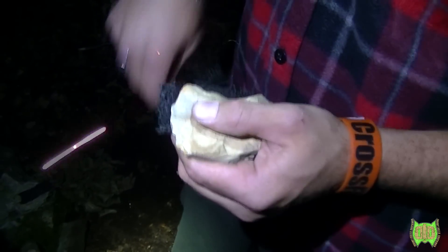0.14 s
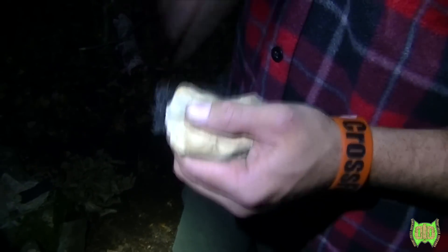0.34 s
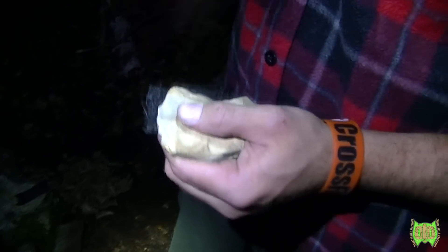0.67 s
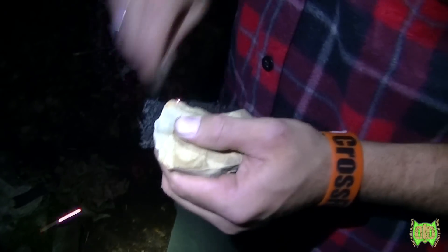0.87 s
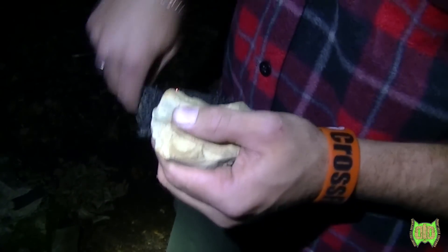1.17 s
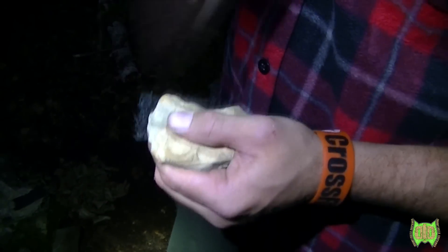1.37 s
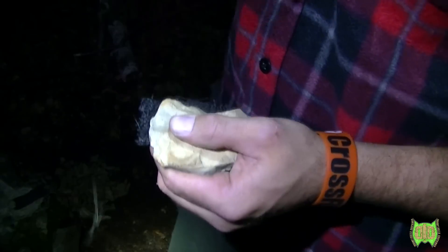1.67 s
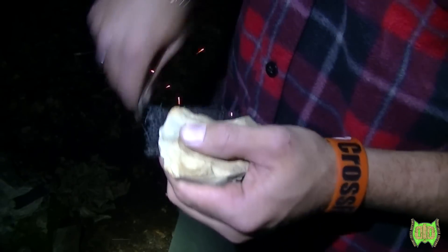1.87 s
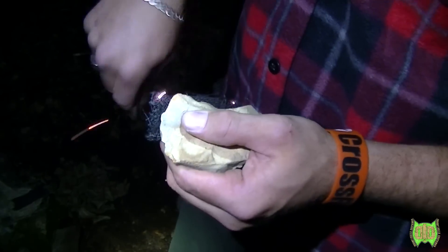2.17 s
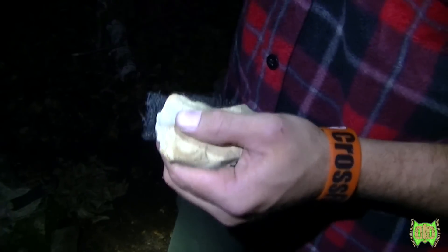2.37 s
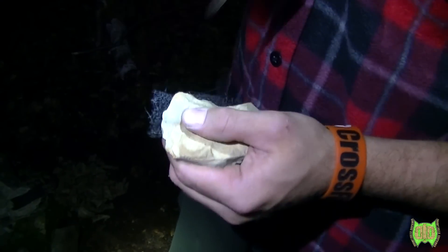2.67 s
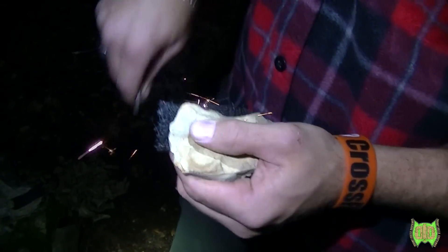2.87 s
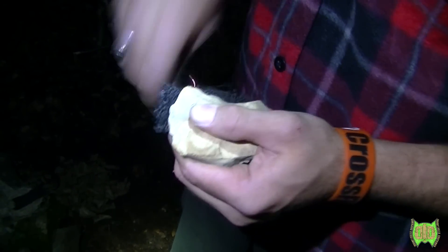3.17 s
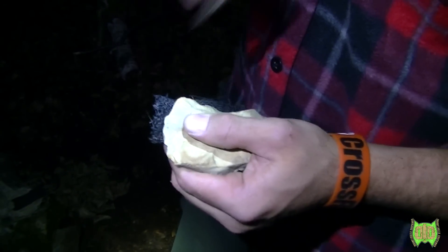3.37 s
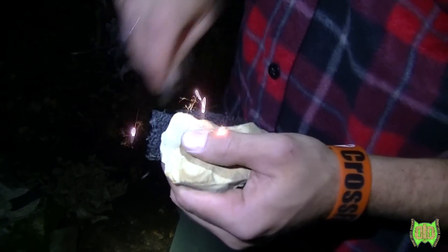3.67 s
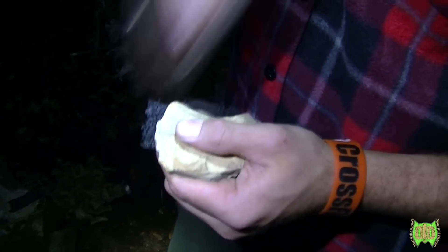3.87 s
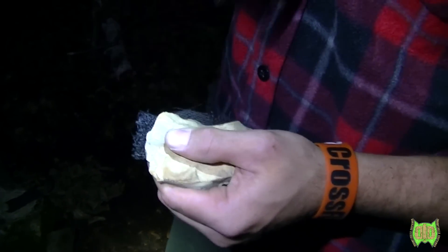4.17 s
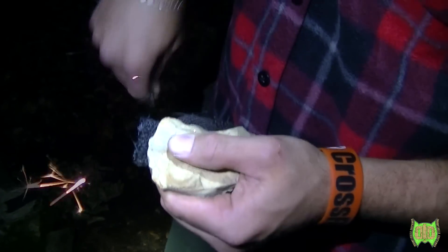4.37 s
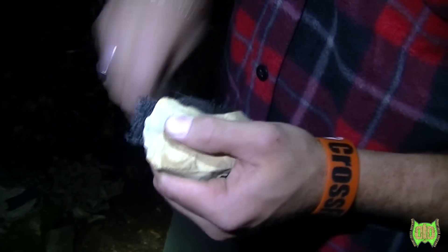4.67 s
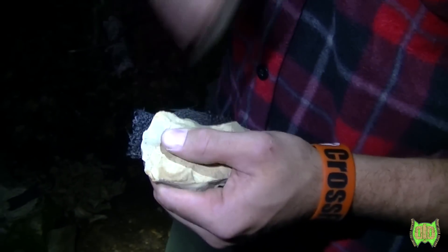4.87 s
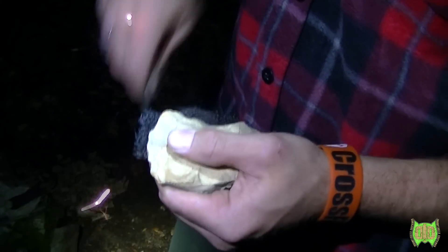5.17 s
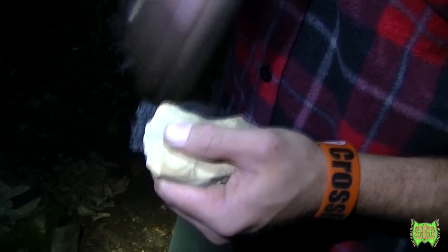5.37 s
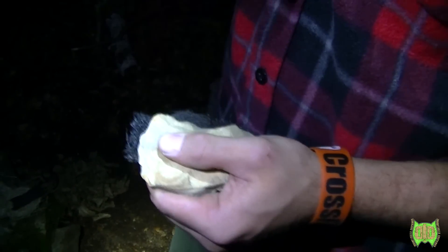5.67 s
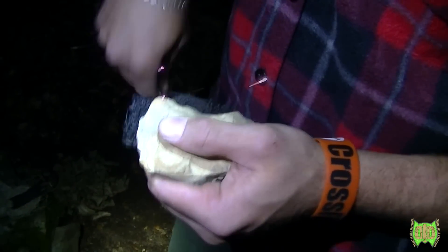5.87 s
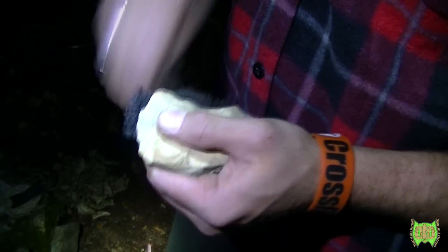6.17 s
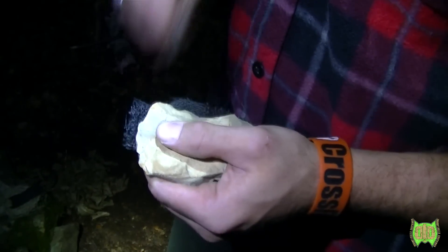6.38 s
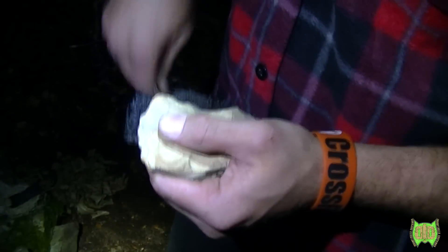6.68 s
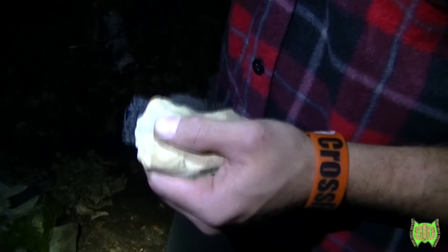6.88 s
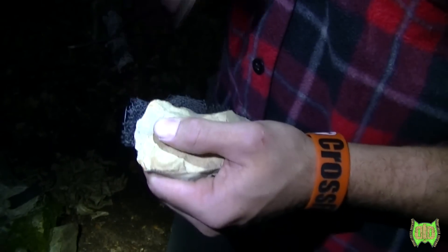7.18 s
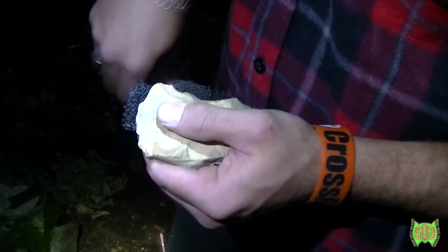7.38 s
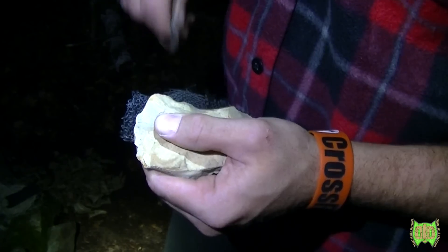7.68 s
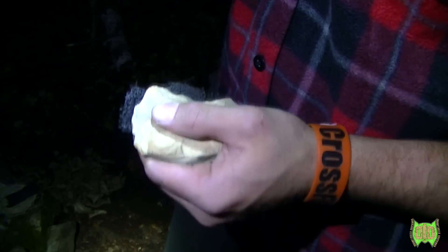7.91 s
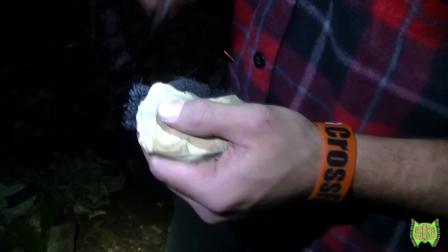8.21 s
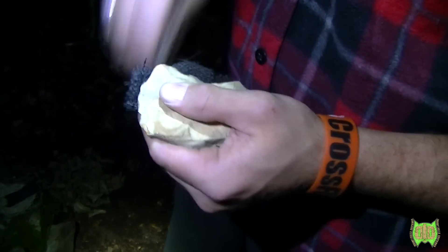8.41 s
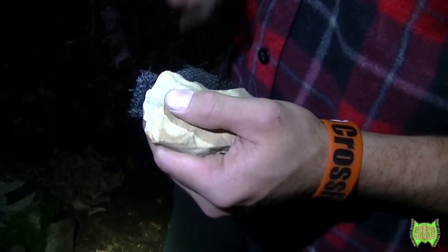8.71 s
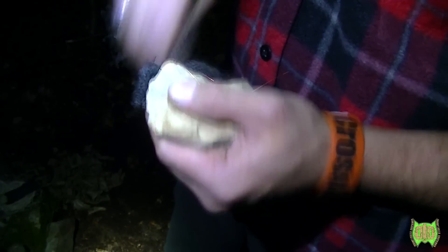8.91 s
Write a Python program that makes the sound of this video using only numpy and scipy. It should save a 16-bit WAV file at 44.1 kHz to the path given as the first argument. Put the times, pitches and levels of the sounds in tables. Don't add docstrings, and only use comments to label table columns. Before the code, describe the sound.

Hard, thin stone-and-metal clacks repeat at a steady but human pace, centred and close, slightly overloading the small microphone, which dips just afterwards. Some strokes are clean, others rasp or click twice. Around them, dry leaves start quietly, then swell in uneven shuffles with crisp crackles, growing busiest near the end. Open night air, with no noticeable echo.

```python
import sys
import numpy as np
from scipy import signal
from scipy.io import wavfile

SR = 44100
rng = np.random.default_rng(int(sys.argv[2]) if len(sys.argv) > 2 else 0)


def gain_from_db(level_db):
    decades = np.asarray(level_db, float) / 20
    return 10 ** decades


def to_wav(s):
    ch = np.atleast_2d(s).T
    pcm = np.round(np.clip(ch, -1, 1) * 32767)
    wavfile.write(sys.argv[1], SR, pcm.astype(np.int16))


N = 399105


def rms_one(x):
    return x / np.sqrt(np.mean(x ** 2) + 1e-20)


def at_hz(points, hz):
    point_hz, level = np.array(points)[:, :2].T
    return np.interp(np.log(hz), np.log(point_hz), level)


def butter(x, hz, kind, order=2):
    return signal.sosfilt(signal.butter(order, hz, kind, fs=SR, output="sos"), x)


def drift(rate_hz):
    r = np.exp(-20 * np.pi * rate_hz / SR)
    noise = rng.standard_normal(N // 10 + 4002)
    slow = signal.lfilter([1], [1, -2 * r, r * r], noise)[4000:]
    return np.interp(np.arange(N) / 10, np.arange(len(slow)), rms_one(slow))


def ring(clicks, hz, t60_s):
    r = gain_from_db(-60 / (t60_s * SR))
    w = 2 * np.pi * hz / SR
    return signal.lfilter([0, np.sin(w)], [1, -2 * r * np.cos(w), r * r], clicks + 1e-18)


def body(clicks, modes):
    return sum(gain_from_db(db) * ring(clicks, hz, t60_s) for hz, db, t60_s in modes)


def add(track, start_s, sound):
    i = round(start_s * SR)
    track[i:i + len(sound)] += sound[:N - i]


def shuffle_db():
    # loudest_s, rustle_db, swell_ms and sink_ms [ms per 10 dB]
    steps = [(0.093, -37, 181, 590), (0.55, -42.5, 150.0, 40.0), (0.784, -36.5, 75, 436),
             (1.434, -27.5, 75, 110), (1.605, -23.5, 224.0, 136), (1.845, -25, 67.0, 293.0),
             (2.066, -24, 94.0, 303), (2.384, -25.4, 8, 276.0), (2.822, -30, 361.0, 55),
             (3.337, -32.5, 1000.0, 258), (3.652, -38.0, 254.0, 93), (3.908, -32.5, 48.0, 988.0),
             (4.262, -20.0, 54, 457), (4.546, -21, 263.0, 117.0), (4.708, -24.5, 95, 61),
             (4.95, -32.2, 44, 479), (5.343, -29.5, 199, 467.0), (5.797, -34.5, 18, 107),
             (6.029, -30.5, 0, 137), (6.204, -32, 52.5, 164), (6.51, -24.5, 108, 166),
             (6.894, -38.5, 140.0, 67.0), (7.05, -35.1, 66, 69), (7.248, -32, 0, 440),
             (7.4, -30.6, 105, 353), (7.724, -28.5, 37, 424.0), (8.035, -22, 171, 59.0),
             (8.269, -24, 32, 924), (8.713, -24, 103, 30), (9.049, -20.5, 439, 98)]
    still_db = -47.5
    t = np.arange(0, N + 64, 64) / SR
    loudest_s, db, swell_ms, sink_ms = np.transpose(steps)[:, :, None]
    before = (loudest_s - t) / np.maximum(swell_ms, 2)
    after = (t - loudest_s) / np.maximum(sink_ms, 2)
    steps_db = db - 1e4 * np.where(t < loudest_s, before, after)
    power = gain_from_db(still_db) ** 2 + np.sum(gain_from_db(steps_db) ** 2, axis=0)
    return np.interp(np.arange(N) / SR, t, 10 * np.log10(power))


def crackle(per_s, spread_db, grain_ms):
    born = rng.random(N) < per_s * gain_from_db(3 * drift(30)) / SR
    sizes = gain_from_db(spread_db * np.minimum(rng.exponential(1, N), 4))
    r = np.exp(-1000 / (grain_ms * SR))
    gate = signal.lfilter([1 - r], [1, -r], born * sizes + 1e-18)
    return gate / gate.mean()


def leaves():
    # pitch_hz, level_db [dB per Hz]
    colour = [(71, -73), (120, -31), (427, -11), (630, -8), (757, -25.5), (988, -7.5), (1240, -5),
              (2590, -2), (3380, -3.5), (4780, 0), (5520, -7.5), (9590, -10), (12800, -23), (15000, -30.5),
              (16000, -36)]
    # pitch_hz, likeness [0 to 1]
    likeness = [(60, 0.71), (130, 0.91), (290, 1), (640, 0.97), (1410, 0.99), (3100, 0.96), (6820, 0.9),
                (15000, 1.0)]
    # pitch_hz, width_hz, level_db
    ridges = [(4550, 700, -7), (3350, 310, -13), (1835, 350, -18.5)]
    # time_s, ringing_db
    curliness = [
        (0, -2),
        (1.5, -1),
        (3, -1),
        (4.5, -2),
        (6, -3),
        (7.2, 3),
        (8.2, 3),
        (9.05, 4),
    ]
    # below the first, and between the other two [Hz]
    differ_hz = (950, 2500, 8600)
    rustle_db = shuffle_db()
    swing_db = rustle_db - rustle_db.mean()
    highs_db = 0.02 * swing_db + 1.07 * drift(3.3)
    lows_db = 1.8 * drift(1.55) - 0.21 * swing_db
    gate = np.sqrt(.5 + .5 * crackle(per_s=500, spread_db=0.5, grain_ms=1.0))
    white = rng.standard_normal((2, 2, N))
    edges = 110 * 2 ** np.arange(0, 7.4, .36)
    out = 0
    for k, (low, high) in enumerate(zip(edges, edges[1:])):
        mid, side = butter(white[k % 2] * gate, [low, high], "band")
        hz = np.sqrt(low * high)
        alike = np.clip(at_hz(likeness, hz), 0, .998)
        up = np.clip(np.log2(hz / 5000), 0, 1.2)
        down = np.clip(np.log2(1100 / hz) * 2, 0, 1)
        gain = gain_from_db(at_hz(colour, hz) + up * highs_db + down * lows_db + 1.15 * drift(12.8))
        out = out + gain * np.array([np.sqrt(1 + alike) * mid, np.sqrt(1 - alike) * side])
    curl = gain_from_db(np.interp(np.arange(N) / SR, *np.transpose(curliness)))
    ringing = sum(gain_from_db(db) * butter(out, [hz - width / 2, hz + width / 2], "band", order=1)
                  for hz, width, db in ridges)
    mid, side = gain_from_db(rustle_db + 4) * rms_one(out + curl * ringing) / 2
    low_side = butter(side, differ_hz[0], "low", order=8)
    side = low_side + butter(side, differ_hz[1:], "band", order=8)
    return mid + side * [[1], [-1]]


def crunches():
    # start_s, peak_db, pitch_hz, t60_s
    events = [(0.721, -18.5, 2250, 0.064), (0.8096, -18, 3170, 0.036), (0.8982, -6.5, 2300, 0.054),
              (0.963, -11, 4200, 0.014), (0.9776, -7, 4900, 0.04), (0.983, -3.5, 4860, 0.038),
              (1.412, -12, 4710, 0.024), (1.8313, -8, 4700, 0.082), (1.9115, -7, 3450, 0.049),
              (2.018, -6.5, 3350, 0.052), (2.259, -17, 1240, 0.053), (2.3948, -14, 3450, 0.04),
              (3.3205, -5, 4300, 0.04), (5.055, -10.5, 3030, 0.03), (5.323, -10, 3480, 0.037),
              (6.0289, -7.5, 3200, 0.019), (6.138, -12, 3080, 0.047), (6.191, -15, 3310, 0.03),
              (6.8072, -11, 1800, 0.045), (7.3062, -10.5, 2300, 0.066), (7.4194, -17, 4160, 0.052),
              (7.4734, -12.5, 1700, 0.047), (7.533, -8.5, 4600, 0.04), (7.5778, -11, 4130, 0.04),
              (8.0175, -4, 3680, 0.068), (8.5678, -0.5, 4470, 0.072), (8.6863, -0.5, 4200, 0.071),
              (8.713, -7, 3080, 0.028), (8.8247, -5, 4260, 0.053), (9, -3, 4540, 0.05)]
    out = np.zeros(N)
    t = np.arange(6000) / SR
    for start_s, peak_db, hz, t60_s in events:
        sizes = gain_from_db(2.5 * np.minimum(rng.exponential(1, len(t)), 3))
        cracks = rms_one(rng.standard_normal(len(t)) * sizes)
        cracks[30] += 7
        fade = np.minimum(t / .0007, 1) * gain_from_db(-60 * t / max(t60_s, .005))
        burst = butter(cracks * fade, [hz / 2.6, min(hz * 2.08, .45 * SR)], "band")
        burst = burst + gain_from_db(2) * butter(burst, [hz / 1.17, hz * 1.2], "band")
        add(out, start_s, gain_from_db(peak_db - 17.5) * burst / np.sqrt(np.mean(burst[:300] ** 2)))
    return butter(out, 980, "high")


def twig():
    # start_s, level_db
    when = (6.7969, -4.5)
    # pitch_hz, level_db, t60_s
    modes = [(583, -15, 0.027), (1330, -4, 0.0083), (2100, 4.5, 0.0051), (3440, 3.5, 0.003),
             (5100, -11, 0.0061)]
    out, snap = np.zeros(N), np.zeros(4096)
    snap[[0, 10, 55]] = -.4, 1, -.6
    add(out, when[0], gain_from_db(when[1] - 5) * body(snap, modes))
    return butter(out, 210, "high")


def flint_modes(place_db):
    # pitch_hz, level_db, t60_s
    low_notes = [(1330, -21, 0.013), (1864, -9.5, 0.013), (2300, 6, 0.0044), (3314, 7.5, 0.0067),
                 (4370, 3.5, 0.0018)]
    leans = [(-0.46, 1.5), (0.93, 0.37), (-0.41, 0.52), (0.033, -0.32), (0.06, -0.82)]
    # pitch_hz, level_db, t60_s
    edge_notes = [(6340, 1, 0.00093), (8250, 0.5, 0.0024), (11320, 0, 0.003)]
    stone = [(hz, db + np.dot(lean, place_db), t60_s) for (hz, db, t60_s), lean in zip(low_notes, leans)]
    return stone + edge_notes


def steel_modes(loose_db, grip_db):
    # pitch_hz, split_hz
    pairs = [(1650, 20), (3150, 140), (6450, 130), (8125, 70), (12050, 160)]
    ring_s = [.12, .03, .04, .045, .035]
    usual_db = [-40, -32, -23.5, -27, -27.5]
    leans = [(-0.73, 0.46), (0, 0), (0.42, 0.04), (0.5, 0.32), (-0.19, -0.82)]
    ring_db = np.array(usual_db) + loose_db + np.dot(leans, grip_db)
    modes = []
    for (hz, split_hz), t60_s, db in zip(pairs, ring_s, ring_db):
        shift, beat = rng.standard_normal(2)
        first_hz = hz * (1 + .004 * shift)
        second_hz = hz * (1 + .004 * shift) + split_hz * (1 + .3 * beat)
        modes += [(first_hz, db + 6, t60_s), (second_hz, db + 3, t60_s * .75)]
    return modes


def scrape(ms, scrape_ms, scrape_db):
    slips = rng.standard_normal(len(ms)) * (rng.random(len(ms)) < .15) * (ms > .4)
    stroke = np.clip(1.15 - (ms / scrape_ms) ** 2, 0, 1)
    grit = gain_from_db(-20.5 - 0.58 * ms)
    return gain_from_db(scrape_db - 10.5) * slips * np.maximum(stroke, grit)


def strikes():
    # start_s, blow_db, scrape_ms, scrape_db, catch_db
    strokes = [(.0800, 3, 7.6, 7.5, 9), (0.4304, 5, 3.9, 3, -5), (.7705, 6, 9.2, 0.5, 11.5),
               (1.1227, 4, 2.8, 1, -8), (1.465, 0, 2.1, 5, -1), (1.805, 5, 3.6, -22, 6),
               (2.1553, 8, 3.1, 7, -23), (2.838, 4.5, 7.9, 8, -29), (3.2085, 2, 2.2, 2, -31),
               (3.5632, -1, 8.1, 4, 12), (3.9543, 4, 2.5, -3, -6), (4.3260, 2, 6.5, 2.5, -15),
               (4.7112, 2, 0.98, -28, -26), (5.079, 4.5, 7.2, -3, -37), (5.457, 2, 7.7, 4, 7),
               (5.8352, 2, 3.3, 7, -19), (6.2208, 4, 2.3, 2, -12), (6.6130, 1, 6.3, 3, 0),
               (6.9962, 5.5, 6.1, 6, 7.5), (7.3866, 5.5, 3.4, -0.5, 6), (8.0435, 3, 3.6, 4, -13),
               (8.4641, -3, 3.1, -8, -2), (8.954, 5, 4.4, 6.5, 11.5)]
    catches = [6.6, 1.4, 3.5, .9, .9, 4, .9, 4.8, .9, 5.3, 1, 2.8, .9, 2.8, 4.4, .9, 1.2, 3.5, 3.9, 2.8,
               2.7, 2.2, 7.2]
    # looseness_db, place_db, slant_db
    grips = [(6.0, 2, -3), (5, -4, 12), (-1, -12, -2), (4.5, 5, 1), (2, 4, 3), (1, -4.0, 6), (5, 8, 2),
             (7, -6, -4), (-6.0, -2, 7), (5, -2, 0), (1, 7, -5), (1, 0, -15), (-5, -4.0, 5), (0.5, -4, 3.0),
             (0, 1, -5), (-1, -2, 9), (-5.5, 9, 0.0), (-1.0, 8, -6), (-2, -2, -6), (1, 1, 9), (2, -3, 7.0),
             (0, 13.0, -6), (1, 6.0, -4.0)]
    # place_db, depth_db
    places = [(7, -3.5), (12, -1), (8, 7), (-1, 0), (-3, -1), (-9, 0), (6, 9), (0, 4.5), (5, -2.5), (6, -4),
              (5, 4), (0.5, 7), (-3, 3), (5, 6), (-8, 0), (-14, -4.5), (-3, 2), (-3, -3.5), (0, 7),
              (-10, 10), (-2, -5), (-8, -6), (-9, -3)]
    out = np.zeros(N)
    ms = np.arange(4096) / SR * 1000
    push = 1. * (np.arange(len(ms)) == 5)
    for stroke, catch_ms, (loose_db, *grip_db), place_db in zip(strokes, catches, grips, places):
        start_s, blow_db, scrape_ms, scrape_db, catch_db = stroke
        drag = scrape(ms, scrape_ms, scrape_db)
        drag[round(catch_ms * SR / 1000)] += gain_from_db(catch_db - 5.5)
        blow = np.zeros(len(ms))
        blow[[0, 5]] = gain_from_db(blow_db) * np.array([-.5, 1])
        force = blow + butter(drag, 12600, "low")
        flint = gain_from_db(-10.0) * body(force, flint_modes(place_db))
        steel = body(push, steel_modes(loose_db, grip_db))
        crack = gain_from_db(-15) * butter(blow, [7000, 15000], "band", order=1)
        add(out, start_s - .0001, flint + steel + crack)
    return butter(out, 1267, "high", order=4)


def scene():
    return strikes() + twig() + crunches() + leaves()


def low_pass(x):
    return signal.sosfilt(signal.butter(12, 15800, fs=SR, output="sos"), x)


def record(dry):
    mid, side = dry.mean(axis=0), (dry[0] - dry[1]) / 2
    port_hz, port_width_hz = 4860, 4300
    port_band = [port_hz - port_width_hz / 2, port_hz + port_width_hz / 2]
    side = side + gain_from_db(-19.5) * butter(mid, port_band, "band", order=1)
    x = butter(np.array([mid + side, mid - side]), 188, "high", order=3)
    over_db = np.maximum(20 * np.log10(np.abs(x).max(axis=0) + 1e-9) + 0.5, 0)
    fall_db = 300 * np.arange(N) / SR
    held_db = np.maximum.accumulate(over_db + fall_db) - fall_db
    r = np.exp(-1 / (0.00029 * SR))
    duck_db = -.8 * signal.lfilter([1 - r], [1, -r], held_db)
    x = np.clip(x * gain_from_db(duck_db), -1.1, 1.1)
    hiss = gain_from_db(-66.5) * butter(rng.standard_normal(N), 5000, "low", order=1)
    x = butter(x + hiss, 16500, "low", order=8)
    return low_pass(x)


dry = scene()
out = record(dry)
to_wav(out)
```